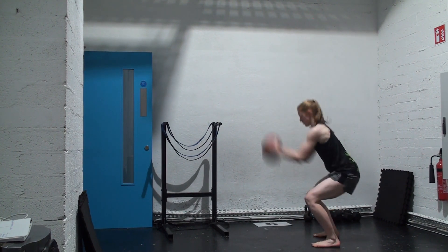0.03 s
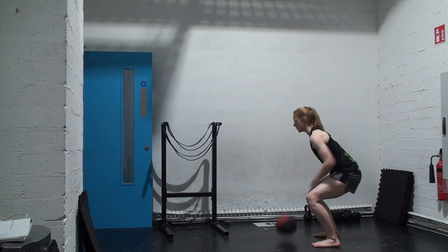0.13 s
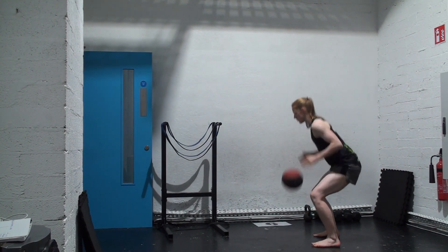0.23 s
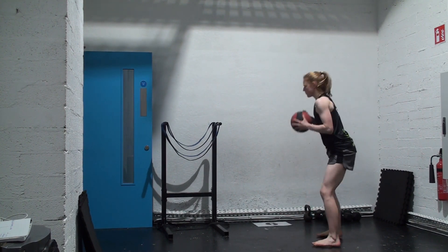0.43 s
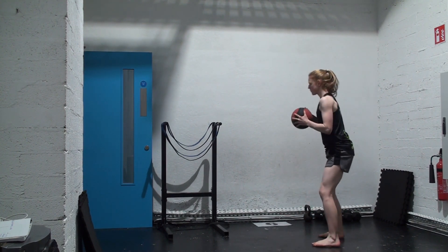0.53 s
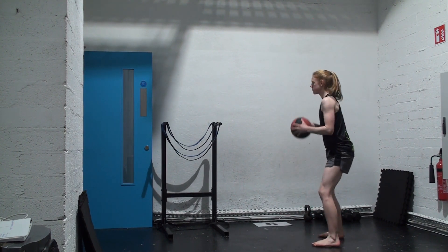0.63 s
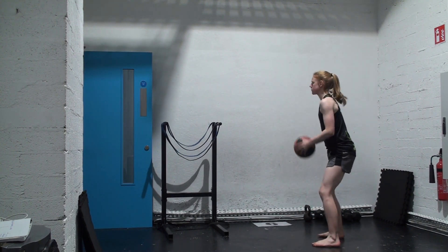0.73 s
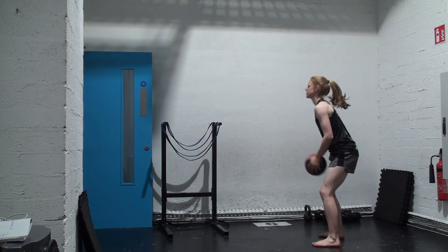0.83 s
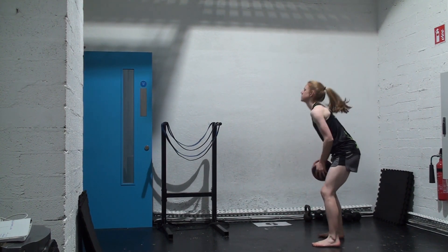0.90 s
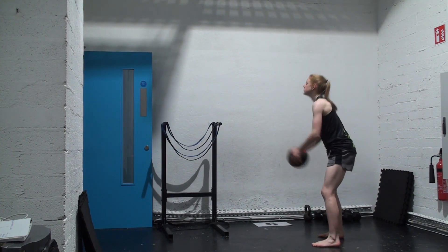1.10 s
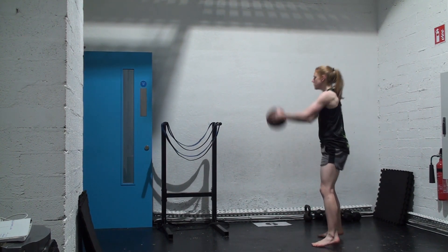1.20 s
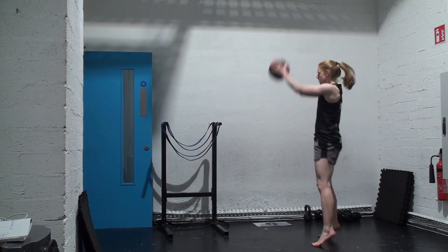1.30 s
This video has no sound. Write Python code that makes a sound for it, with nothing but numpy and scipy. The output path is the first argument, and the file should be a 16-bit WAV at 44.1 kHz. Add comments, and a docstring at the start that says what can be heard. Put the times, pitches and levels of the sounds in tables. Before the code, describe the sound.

A heavy ball slams once onto a hard floor after a faint swish of clothes; a sharp slap with a short low thud fades through the bare, reverberant gym, heard in stereo from within the room.

```python
"""A quiet rush of air and a low hum come first, then clothes swish as the arms come down.
A puff of air precedes one sharp slap: a heavy rubber ball slammed on the hard floor of a bare brick gym.
The slap is a shaped impulse with wall echoes and scattered reflections; a decaying sine is the floor's thud.
Filtered noise makes the dense, darkening reverberation, the swish and the ventilation; sines make the
room's low ringing and the hum."""
import sys
import numpy as np
from scipy import signal
from scipy.fft import rfft, irfft, next_fast_len
from scipy.io import wavfile
from scipy.ndimage import map_coordinates

SR = 44100
rng = np.random.default_rng(int(sys.argv[2]) if len(sys.argv) > 2 else 0)


def output_pcm(signal):
    """Save a mono or channel-first signal as 16-bit PCM at the path in sys.argv[1].

    Samples are clipped to [-1, 1] before scaling.
    """
    pcm = np.clip(np.atleast_2d(signal).T, -1, 1) * 32767
    wavfile.write(sys.argv[1], SR, np.round(pcm).astype(np.int16))


N = 59535  # length in samples

# Spectrum of the slap: frequency_hz, level_db
SLAP_SPECTRUM = [(40, -24), (200, -11), (600, 1), (1200, -1), (2500, -6.5), (6000, -11.5), (12000, -20),
                 (16000, -42)]
# First wall echoes: delay_s, level_db, left_over_right_db
WALL_ECHOES = [(.00172, -2, 6.5), (.00575, -17.5, -1), (.0075, -13, -2), (.0088, -12, 2), (0.0118, -16, 4),
               (0.0139, -5, -3), (.018, -12, -4), (0.02, -13, 4), (.0244, -9, 0)]
# Loss at the walls: frequency_hz, gain_db
WALL_ABSORPTION = [(300, -1.5), (3000, -2), (8000, -3), (14000, -1)]
# Relative spectral density of the reverberation: frequency_hz, density_db
ECHO_SPECTRUM = [(25, -12), (42, -6), (80, -6.5), (108, -8.5), (145, -8.5), (205, -17), (295, -2),
                 (373, -3.5), (470, -3), (610, -2.5), (900, -6.5), (1560, -10), (2160, -11.5),
                 (3820, -17.5), (7310, -21.5), (11900, -33), (16000, -49)]
# Reverberation time, for a fall of 60 dB: frequency_hz, t60_s
REVERB_TIME = [(40, 0.65), (120, 1.38), (350, 1.254), (1000, 1.437), (2200, 1.507), (4000, 1.33),
               (7000, 0.94), (10000, 0.68), (15000, 0.29)]
# Left-right correlation of the reverberation: frequency_hz, correlation_0_to_1
ECHO_CORRELATION = [(30, 1), (70, 0.82), (130, 0.73), (500, 0.67), (2000, 0.77), (5000, 0.84), (9000, .76),
                    (11500, 0.95)]
# Stereo balance of the room's response: frequency_hz, left_over_right_db
ROOM_BALANCE = [(40, -0.5), (125, -2.5), (300, -1), (1000, -1.1), (2000, -0.9), (10000, -0.7)]
# Standing waves of the room: frequency_hz, level_db, t60_s
ROOM_MODES = [(40.92, -41.5, 1.9), (45.78, -38.5, 1.97), (76.07, -37, 1.35), (147.4, -43.5, 1.29),
              (307.7, -35.5, 1), (457, -31.5, 0.64), (594.3, -36, 1.35), (904, -48, 1.5),
              (1056, -40.5, 1.3)]
# Loudness of the clothes: time_s, level_db
SWISH_LEVEL = [(0, -67.5), (.03, -64), (.11, -67), (.16, -68.5), (.185, -57.5), (0.207, -55.5),
               (.23, -57.5), (.25, -58.5), (.3, -100)]
# Relative spectral density of the clothes: frequency_hz, density_db
CLOTH_SPECTRUM = [(100, 4), (600, -0.5), (2000, -3.5), (5000, -4.5), (11000, -7), (16000, -17)]
# Relative spectral density of the ventilation: frequency_hz, density_db
AIR_SPECTRUM = [(25, 2.5), (75, 2), (130, -4.5), (400, -6.5), (1500, -5.5), (3000, -17.5), (6000, -20),
                (10000, -30), (16000, -30)]
# Left-right correlation of clothes and ventilation: frequency_hz, correlation_0_to_1
AIR_CORRELATION = [(60, .99), (110, .97), (220, .55), (700, .45), (2400, .48), (8000, .72), (13000, .95)]

SLAM_S, SLAM_DB = .2475, 8.5  # contact time, gain of the slap
SCATTER_PER_S, SCATTER_DB, SCATTER_T60_S = 390, -9, 0.75  # later reflections: rate, greatest level, decay
SCATTER_LEAN_DB, SCATTER_SPREAD_DB = -1.5, 3  # their mean left-over-right level, its standard deviation
THUD_HZ, THUD_DB, THUD_T60_S = 69, -32, 0.16
ECHO_DB, START_DB, BUILD_S, HOLD_S = -22.5, -3, 0.068, 0.046  # level, start relative to it, swell, hold
ECHO_ONSET_S = 0.0094
CLUMP_DB, CLUMP_PER_S = 0.34, 70  # random unevenness of the echo: depth, rate
MODE_RISE_S = 0.096
PUFF_LEAD_S, PUFF_HZ, PUFF_WIDTH_S, PUFF_DB = 0.0067, 196, 0.0016, -34.5
AIR_DB, HUM_HZ, HUM_DB = -63, 76.3, -65
TOP_HZ = 16200  # band limit


def amp(db):
    """Level and gain: 20 dB is a factor of ten in pressure."""
    return 10 ** (np.asarray(db) / 20)


def unit(x):
    """Normalization: scale to rms 1."""
    return x / np.sqrt(np.mean(x ** 2) + 1e-20)


def along(points, hz):
    """Logarithmic interpolation between (frequency, value) points."""
    point_hz, values = np.transpose(points)
    return np.interp(np.log(hz + 1), np.log(point_hz + 1), values)


def pan(left_over_right_db):
    """Level-difference stereo: half the difference raises the left, half lowers the right."""
    return amp(np.array([[.5], [-.5]]) * left_over_right_db)


def filtered(x, response):
    """Linear filtering: multiply the spectrum by a response of frequency."""
    size = next_fast_len(N + SR // 2)
    spectrum = rfft(x, size) * response(np.fft.rfftfreq(size, 1 / SR))
    return irfft(spectrum, size)[..., :N]


def causal(points, size=4096):
    """Minimum phase: folding the cepstrum forward packs a spectrum into a one-sided pulse."""
    gain = amp(along(points, np.fft.rfftfreq(size, 1 / SR)))
    cepstrum = irfft(np.log(gain))
    cepstrum[1:size // 2] *= 2
    cepstrum[size // 2 + 1:] = 0
    return irfft(np.exp(rfft(cepstrum)))


def diffuse(spectrum, correlation=ECHO_CORRELATION):
    """Diffuse field: mid and side noises mix into stereo of a set left-right correlation, at rms 1."""
    def response(hz):
        angle = np.arccos(np.clip(along(correlation, hz), -1, 1)) / 2
        return amp(along(spectrum, hz)) * [np.cos(angle), np.sin(angle)]

    mid, side = filtered(rng.standard_normal((2, N)), response)
    return unit(np.array([mid + side, mid - side]))


def slap():
    """Impact and specular reflection: one pressure spike returns from the walls, dulled by absorption."""
    direct, reflections = np.zeros(N), np.zeros((2, N))
    direct[round(SLAM_S * SR)] = 1
    for delay_s, level_db, lean_db in WALL_ECHOES:
        reflections[:, round((SLAM_S + delay_s) * SR)] += amp(level_db) * pan(lean_db)[:, 0]
    # random later reflections begin after the last tabulated echo
    t = np.arange(N) / SR - SLAM_S
    arrives = (rng.random(N) < SCATTER_PER_S / SR) & (t > WALL_ECHOES[-1][0])
    sides = pan(SCATTER_LEAN_DB + SCATTER_SPREAD_DB * rng.standard_normal(N))
    strength = rng.uniform(.5, 1, N) * amp(SCATTER_DB - 60 * t / SCATTER_T60_S)
    reflections += arrives * sides * strength
    arrivals = direct + filtered(reflections, lambda hz: amp(along(WALL_ABSORPTION, hz)))
    pulse = causal(SLAP_SPECTRUM)
    return amp(SLAM_DB) * signal.fftconvolve(arrivals, pulse[None], axes=1)[:, :N]


def thud():
    """Damped oscillation: the floor gives under the ball's weight and springs back."""
    t = np.maximum(np.arange(N) / SR - SLAM_S, 0)
    decay = amp(THUD_DB - 60 * t / THUD_T60_S)
    return decay * np.sin(2 * np.pi * THUD_HZ * t) * pan(along(ROOM_BALANCE, THUD_HZ))


def echo():
    """Reverberation: a dense field builds up, holds, then decays at each frequency's own rate."""
    wash = filtered(diffuse(ECHO_SPECTRUM), lambda hz: pan(along(ROOM_BALANCE, hz)))
    hz, frame_s, bins = signal.stft(wash, SR, nperseg=512)
    age = np.maximum(frame_s - SLAM_S - BUILD_S - HOLD_S, 0)
    decay = amp(-60 * age / along(REVERB_TIME, hz)[:, None])
    tail = signal.istft(bins * decay, SR, nperseg=512)[1][:, :N]
    t = np.arange(N) / SR - SLAM_S
    swell_db = START_DB * np.clip(1 - t / BUILD_S, 0, 1)
    # smooth random level changes
    clump_positions = np.arange(N) * CLUMP_PER_S / SR
    clump_db = CLUMP_DB * map_coordinates(rng.standard_normal(size=512), [clump_positions])
    onset = np.clip(t / ECHO_ONSET_S, 0, 1)
    return tail * amp(ECHO_DB + swell_db + clump_db) * onset


def boom():
    """Room modes: standing waves between the walls grow after the blow and ring out."""
    t = np.maximum(np.arange(N) / SR - SLAM_S, 0)
    rise = np.minimum(t / MODE_RISE_S, 1)
    age = np.maximum(t - MODE_RISE_S, 0)
    ringing = np.zeros((2, N))
    for hz, level_db, t60_s in ROOM_MODES:
        wave = np.sin(2 * np.pi * (hz * t + rng.random()))  # random starting phase
        ringing += pan(along(ROOM_BALANCE, hz)) * amp(level_db - 60 * age / t60_s) * wave
    return rise * ringing


def puff():
    """Displaced air: squeezed from under the ball, it gives one soft push and pull before contact."""
    t = np.arange(N) / SR - SLAM_S + PUFF_LEAD_S
    envelope = np.exp(-.5 * (t / PUFF_WIDTH_S) ** 2)
    return -amp(PUFF_DB) * np.sin(2 * np.pi * PUFF_HZ * t) * envelope


def swish():
    """Friction noise: clothes brush as the arms come down."""
    time_s, level_db = np.transpose(SWISH_LEVEL)
    level = amp(np.interp(np.arange(N) / SR, time_s, level_db))
    return level * diffuse(CLOTH_SPECTRUM, AIR_CORRELATION)


def ventilation():
    """Flow noise and a tone: a steady rush of air with a low fan hum."""
    rush = amp(AIR_DB) * diffuse(AIR_SPECTRUM, AIR_CORRELATION)
    hum = amp(HUM_DB) * np.sin(2 * np.pi * HUM_HZ * np.arange(N) / SR)
    return rush + hum


def scene():
    """Superposition: the pressures of the throw, the slam and the room add."""
    return swish() + puff() + slap() + thud() + echo() + boom() + ventilation()


def record(dry):
    """Band limiting: nothing at or above the top frequency is kept."""
    return filtered(dry, lambda hz: hz < TOP_HZ)


dry = scene()
out = record(dry)
output_pcm(out)
```